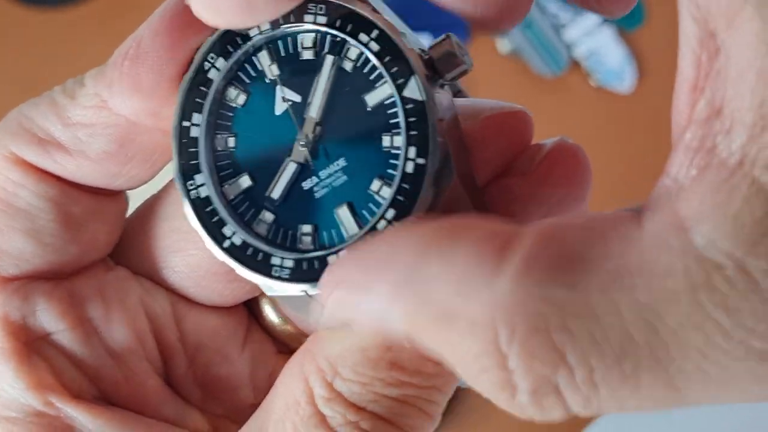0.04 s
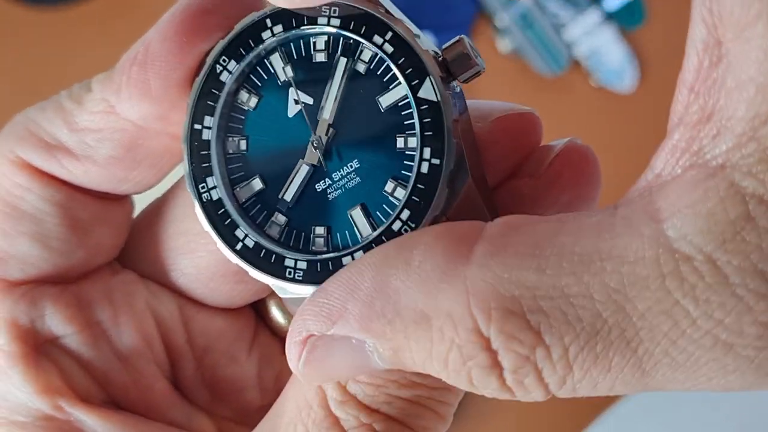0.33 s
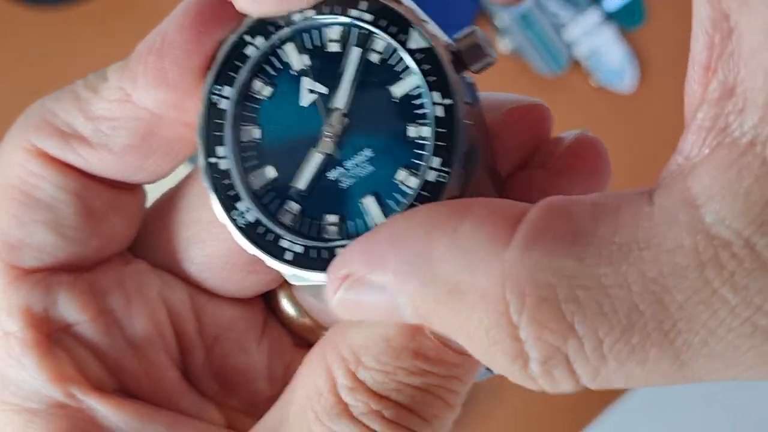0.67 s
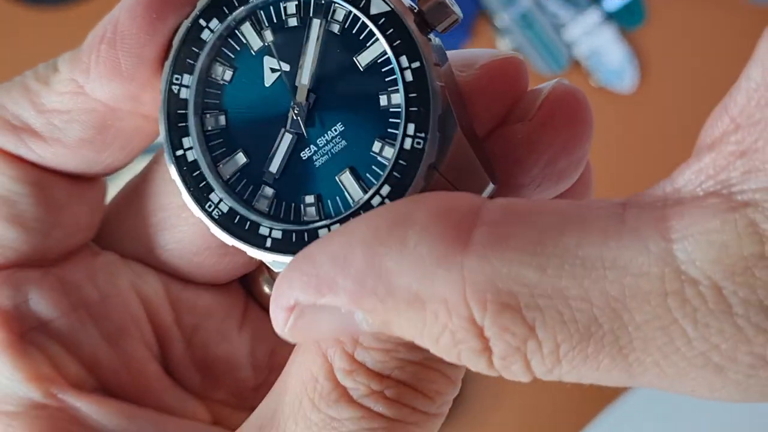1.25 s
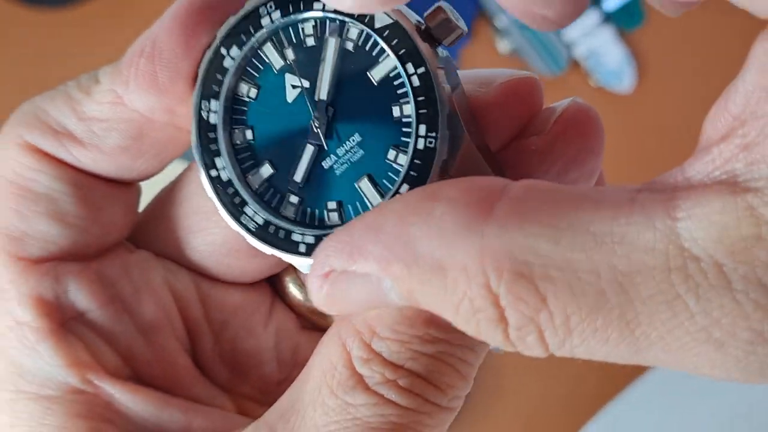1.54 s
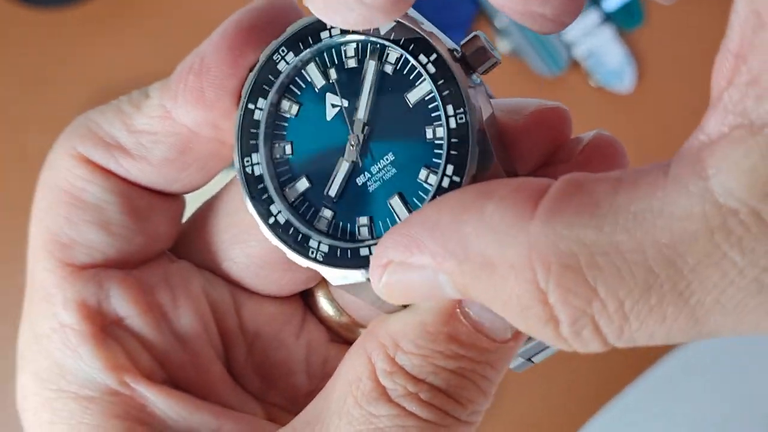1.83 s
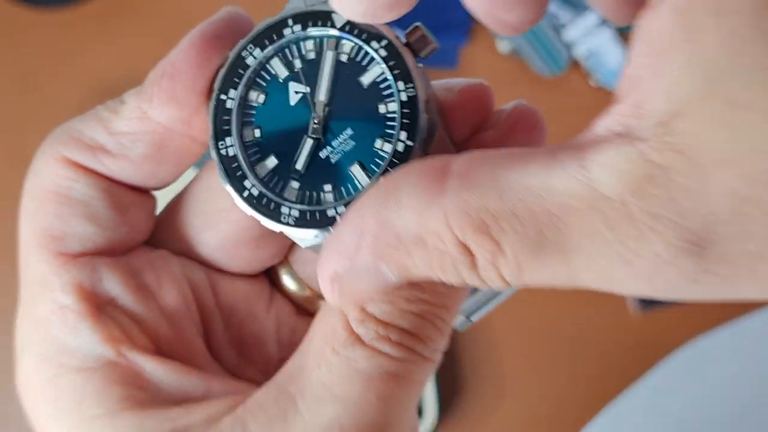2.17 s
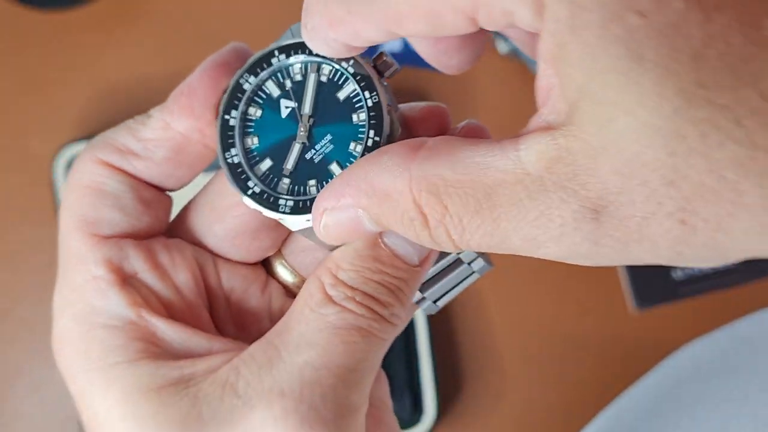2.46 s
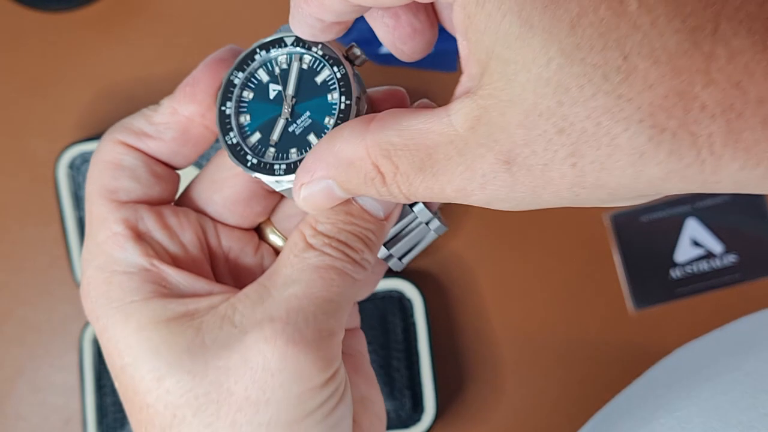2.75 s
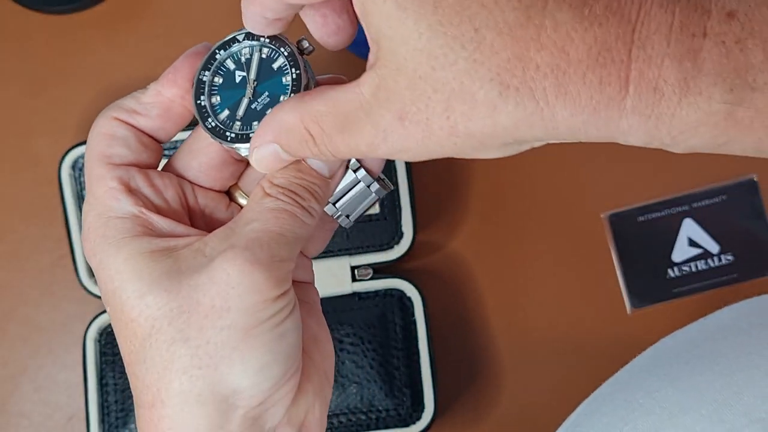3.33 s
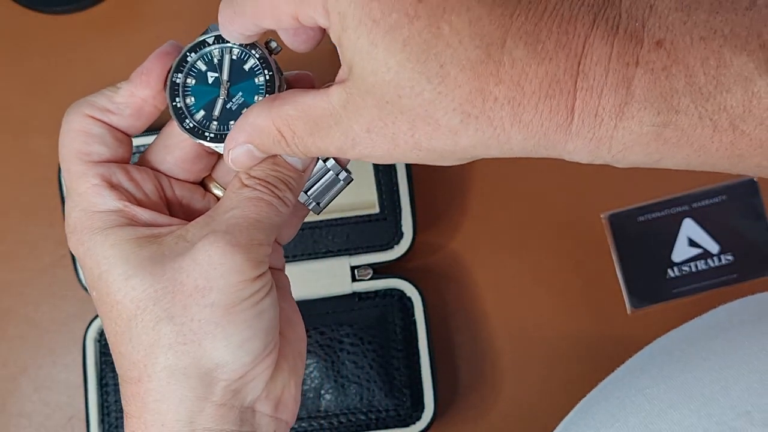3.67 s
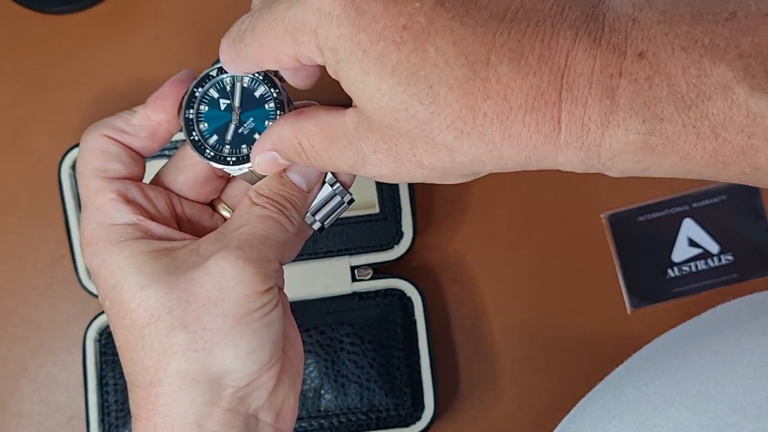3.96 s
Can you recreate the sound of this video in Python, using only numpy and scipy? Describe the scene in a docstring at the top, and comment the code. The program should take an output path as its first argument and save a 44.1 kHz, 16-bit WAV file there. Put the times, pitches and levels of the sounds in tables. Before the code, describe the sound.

Crisp ratcheting clicks come from a watch bezel twisted close to the microphone, in six brief bursts separated by pauses. Faint finger rubs and a few dull handling bumps accompany them over the low hum of a quiet room.

```python
"""Turning a watch bezel

A steel bezel is turned by hand in six short twists, close up in a quiet room. At each tooth the click
spring snaps and rings the case; every new grip colours the ring and the echo off the desk.
The hands bump softly, skin rubs on the rim and the bracelet rustles, over a low room hum."""
import sys
import numpy as np
from scipy import signal
from scipy.fft import rfft, irfft, next_fast_len
from scipy.io import wavfile
from scipy.ndimage import uniform_filter1d, map_coordinates

SR = 44100
rng = np.random.default_rng(int(sys.argv[2]) if len(sys.argv) > 2 else 0)


def store_pcm(level_fs):
    """Save levels as 16-bit WAV."""
    pcm = np.round(np.clip(level_fs, -1, 1) * 32767).astype(np.int16)
    wavfile.write(sys.argv[1], SR, np.atleast_2d(pcm).T)


N = 176400

# room air spectrum: (frequency [Hz], relative density [dB])
AIR_SPECTRUM = [(15, -53), (25, -19), (53, -1), (240, -1.5), (289, 2.5), (322, -1), (631, -9), (722, -10.5),
                (804, -5), (871, -5.5), (1020, -15), (1200, -6), (1300, -12.5), (1450, -10.5), (3090, -23),
                (5880, -21.5), (15500, -23)]
AIR_DB = -54.5


def amp(db):
    return 10 ** (np.asarray(db) / 20)


def unit_energy(x):
    return x / np.sqrt(np.sum(x ** 2) + 1e-20)


def bell(x, centre, sigma):
    return np.exp(-.5 * ((x - centre) / sigma) ** 2)


def log_interp(points, hz):
    freqs, values = np.transpose(points)
    return np.interp(np.log(hz + 1), np.log(freqs + 1), values)


def mix_at(track, time_s, x):
    i = max(round(time_s * SR), 0)
    track[i:i + len(x)] += x[:len(track) - i]


def filtered(x, response):
    size = next_fast_len(N + SR // 2)
    return irfft(rfft(x, size) * response(np.fft.rfftfreq(size, 1 / SR)), size)[..., :N]


def minimum_phase(gain_db):
    """Causal response with this gain."""
    cepstrum = irfft(np.log(amp(gain_db)))
    cepstrum[1:len(cepstrum) // 2] *= 2
    cepstrum[len(cepstrum) // 2 + 1:] = 0
    return np.exp(rfft(cepstrum))


def noise(spectrum):
    """Coloured noise, rms 1."""
    coloured = filtered(rng.standard_normal(N), lambda hz: amp(log_interp(spectrum, hz)))
    return np.sqrt(N) * unit_energy(coloured)


def burst(t, t60_s):
    """Decaying white noise."""
    return rng.standard_normal(len(t)) * amp(-60 * t / t60_s)


def friction(swells, spectrum):
    """Coloured noise in Gaussian swells."""
    t = np.arange(N) / SR
    return noise(spectrum) * sum(amp(db) * bell(t, time_s, sigma_s) for time_s, db, sigma_s in swells)


def in_room(near, spill, tail_db):
    """Near sound plus the spill's reflections off nearby things and walls, drawn anew per call."""
    # wall reverberation: (frequency [Hz], T60 [s])
    decay = [(200, 0.54), (1500, 0.3), (4000, 0.23), (9000, 0.21), (15000, 0.16)]
    hz, t, bands = signal.stft(rng.standard_normal(SR // 3), SR, nperseg=256)
    tail = signal.istft(bands * amp(-60 * t / log_interp(decay, hz)[:, None]), SR, nperseg=256)[1]
    t = np.arange(len(tail)) / SR
    onset = 1 - np.exp(-(t / .004) ** 2)
    early = amp(-12) * unit_energy(burst(t, t60_s=.052) * onset)
    reflections = early + amp(tail_db) * unit_energy(tail * onset)
    return np.pad(near, (0, len(reflections) - 1)) + signal.fftconvolve(spill, reflections)


def room_tone():
    """Steady air noise and a faint wavering hum."""
    # hum tones: (frequency [Hz], rms level [dB])
    tones = [(65, -73), (204, -72.5), (301, -67.5)]
    t, hum, knots = np.arange(N) / SR, np.zeros(N), 24
    for hz, db in tones:
        waver_rad = .91 * map_coordinates(rng.standard_normal(knots + 4), [np.linspace(0, knots, N)])
        hum += amp(db) * np.sqrt(2) * np.sin(2 * np.pi * hz * t + waver_rad)
    return amp(AIR_DB) * noise(AIR_SPECTRUM) + hum


def bracelet_rustle():
    """Fingers shift on the bracelet: faint, bright friction."""
    # finger shifts: (time [s], level [dB], sigma [s])
    shifts = [(2.04, -65, .025), (2.255, -66, .02), (2.85, -64.5, .03), (3, -65, 0.011), (3.76, -60, .012)]
    # rustle spectrum: (frequency [Hz], relative level [dB])
    spectrum = [(1000, -25), (3500, -6), (6000, -1), (9000, -5), (15000, -18)]
    return friction(shifts, spectrum)


def skin_rubs():
    """Skin slides on the rim: brief, dull friction."""
    # slides: (time [s], level [dB], sigma [s])
    slides = [(0.385, -51.5, 0.0065), (0.48, -51, 0.01), (.55, -51, 0.041), (.667, -52, 0.01),
              (.723, -51, .012)]
    # skin friction spectrum: (frequency [Hz], relative level [dB])
    spectrum = [(200, -18), (600, -6.5), (850, 4), (1300, -5.5), (2300, -14), (4500, -34), (15000, -34)]
    return friction(slides, spectrum)


def hand_bumps():
    """Each bump is a short fleshy tap and a damped low thud."""
    # bumps: (time [s], level [dB], pitch [Hz], T60 [s])
    bumps = [(1.326, -41.5, 362, 0.015), (1.887, -37.5, 528, .01), (1.94, -31, 206, 0.035),
             (1.941, -39, 500, 0.015), (1.971, -41, 196, 0.072), (2.196, -18.5, 358, 0.015),
             (2.204, -39.5, 190, 0.14), (2.222, -45, 400, 0.12), (2.622, -38, 322, 0.016),
             (3.297, -34.5, 410, 0.008), (2.309, -46.5, 69, 0.22), (3.481, -41, 66, 0.23),
             (3.6, -42.5, 69, 0.17), (3.81, -44, 69, 0.19), (3.849, -46, 66.4, .2),
             (3.957, -37, 455, 0.014)]
    tap_hz, tap_t60_s, rise_cycles = 620, .0089, .52
    track, t = np.zeros(N), np.arange(SR // 4) / SR
    tap = np.sin(2 * np.pi * tap_hz * t) * amp(-60 * t / tap_t60_s) * (1 - np.exp(-t * tap_hz))
    for time_s, db, hz, t60_s in bumps:
        rise = 1 - np.exp(-(t * hz / rise_cycles) ** 2)
        thud = np.sin(2 * np.pi * hz * t) * amp(-60 * t / t60_s) * rise
        tap_gain = amp(-8) * hz / tap_hz
        bump = thud / np.abs(thud).max() + tap_gain * tap / np.abs(tap).max()
        mix_at(track, time_s, amp(db) * in_room(bump, bump, tail_db=-18))
    return track


def spring_click(time_s, clack_db=0, body_db=0, low_db=2, high_hz=11000, high_db=5,
                 sparkle_db=-8, snap_db=-9):
    """Snap, chatter and dense ring through the gripped case; returns near sound and room spill."""
    # hand grips: (start [s], clack peak [Hz], its gain [dB], low resonance [Hz], rise [s],
    #   desk echo [dB], spill past the hand [dB])
    grips = [(0, 2440, -2.5, 7900, 0.00066, -17, 1.5), (.4, 4020, 6.5, 7960, 0.00063, -9.5, 0.5),
             (1.5, 2440, 4, 7560, 0.00045, -10, 0.5), (2.4, 2980, 7, 8100, 0.00056, -15.5, -2),
             (3, 2790, 2.5, 9000, 0.00047, -28, -3), (3.7, 2400, 3.5, 6060, 0.00028, -27, -4)]
    # case response to a snap: (frequency [Hz], gain [dB])
    case = [(60, -3.5), (350, -3), (700, -11.5), (1150, -18.5), (1700, -10), (2500, -4), (3500, -2.5),
            (4200, -3), (5200, -2.5), (6200, 1.5), (8500, 5), (10000, 3), (12500, 3), (15000, 3),
            (16500, 1.5)]
    grip = sum(time_s >= start_s for start_s, *_ in grips[1:])
    _, peak_hz, peak_db, low_hz, rise_s, desk_db, spill_db = grips[grip]
    size, desk_delay_s = 4096, .008
    t, hz = np.arange(size) / SR, np.fft.rfftfreq(size, 1 / SR)
    octave = np.log2(hz + 1)
    rise = 1 - np.exp(-(t / rise_s) ** 2)
    chatter = unit_energy(burst(t, t60_s=.005) * rise)
    ring = amp(-1.5) * rfft(unit_energy(burst(t, t60_s=.033) * rise))
    force = rfft(chatter) + amp(snap_db)  # the snap is an impulse
    force /= np.sqrt(np.abs(uniform_filter1d(np.abs(force) ** 2, size=120)))  # flatten broad bands

    case_db = (log_interp(case, hz)
               + clack_db * bell(octave, np.log2(1670), .66)
               + body_db * bell(octave, np.log2(5600), .27)
               + sparkle_db * bell(hz, 14400, 1150)
               + peak_db * bell(hz, peak_hz, 276))
    resonances_db = low_db * bell(hz, low_hz, 540) + high_db * bell(hz, high_hz, 880)
    softened = minimum_phase(case_db + .65 * resonances_db)  # weaker peaks for ring and spill
    direct = unit_energy(irfft(force * minimum_phase(case_db + resonances_db) + ring * softened))
    desk_gain = amp(desk_db) * bell(octave, np.log2(7000), 1.5)
    desk_echo = desk_gain * np.exp(-2j * np.pi * hz * desk_delay_s)
    near = irfft(rfft(direct) * (1 + desk_echo))
    spill = amp(spill_db) * unit_energy(irfft((force + ring) * softened))
    return near[:size // 2], spill[:size // 2]


def bezel():
    """Ratchet clicks and light touches ring the same steel, each slightly panned; returns mid, side."""
    # spring drops over a tooth: (time [s], relative level [dB], clack [dB], body [dB],
    #   low resonance [dB], high resonance [Hz], its gain [dB], sparkle [dB], snap [dB])
    teeth = [(.0002, -25.5, 9, 0, 5, 11900, 4, -4, 9), (0.0126, -22.5, 10.5, -1, 3, 10600, 6.5, 3, 2),
             (0.0335, -20.9, 10.5, 0.5, 2, 10800, 11.5, 6, -6),
             (0.5112, -22.5, 2, 1, 2, 13400, 9, -0.5, -10), (0.5222, -23.5, 6.5, 6, 2, 10350, 10, 11, -13),
             (0.5347, -19.5, -6, -5, 2, 12000, 9, -2, 3), (0.5465, -22.5, -1, -1.5, 5.5, 11650, 3, 1, -12),
             (0.5608, -22, -6, 1, -1, 11650, 11, 4, -10), (0.5772, -22.5, 5.5, 1, 18, 10550, 12, -3, -4),
             (0.6038, -21, -6.5, -3, 2, 11500, 8, 0, 0), (1.6139, -24, -4.5, 2.5, 6, 11300, 10, -1.5, -13),
             (1.645, -23.5, 4, -2, 9.5, 11200, 8, 2, -3), (1.6897, -22.5, -2, 1, 9.5, 12400, 6, 4, -15),
             (1.727, -20.5, -2, -1, 12, 12300, 9.5, 2.5, -8),
             (1.7499, -19.5, -3, 0, 7.5, 12150, 8.5, 3, -8), (1.7807, -22, -3, -1, 4, 12250, 4, 1, -10),
             (1.807, -21.5, 0.5, -1, 3, 12100, 1, 1.5, -10),
             (1.8399, -21.5, 9, -0.5, 8, 11600, 7.5, 1.5, -15),
             (2.4845, -19.5, 6, -3, 2, 12760, 13, -4.5, -8), (2.55, -17.5, 1.5, 4, 7.5, 13000, 13, 1, -9),
             (2.5877, -20.8, -4.5, 5, 4.5, 13700, 10, -4, -18), (2.6213, -19, -3, 2, 5, 13500, 5, 3, -10),
             (3.1139, -17.5, -2.5, 4, 7.5, 13200, 12.5, 0, -1.5),
             (3.1727, -21.5, -1.5, 5.5, 8, 12050, 1, 3, -7), (3.212, -18.5, 0.5, 4, 8, 12900, 0, 2, -1),
             (3.236, -19, 9.5, 6, 4, 12400, 5, 5.5, 3), (3.8287, -18, 2.5, 3, 1, 13050, 2, 2, -8),
             (3.8548, -17, 4, -4, 10, 12700, 8.5, -1, 4), (3.9394, -19.5, 9, 1.5, 6, 10000, 8.5, 4.5, -2),
             (3.985, -16.5, 5, -3.5, 13.5, 12400, 4, 8, 0)]
    # nail and bracelet touches: (time [s], relative level [dB])
    touches = [(.155, -54), (1.001, -57), (2.056, -53), (2.069, -57), (2.255, -52), (2.272, -55),
               (2.295, -52), (3.809, -46)]
    gain_db, pan_spread_db = 23, .5
    mid, side = np.zeros(N), np.zeros(N)
    for time_s, db, *colour in teeth + touches:
        near, spill = spring_click(time_s, *colour)
        click = amp(db + gain_db) * in_room(near, spill, tail_db=-11)
        pan = (amp(pan_spread_db * rng.standard_normal()) - 1) / 2
        mix_at(mid, time_s, click)
        mix_at(side, time_s, click * pan)
    return mid, side


def scene():
    """All sources near centre, with a trace of width."""
    steel, steel_side = bezel()
    scatter = unit_energy(burst(np.arange(SR // 50) / SR, t60_s=.0061))
    side = steel_side + amp(-37) * signal.fftconvolve(steel, scatter)[:N]
    side += amp(AIR_DB - 30) * noise(AIR_SPECTRUM)
    mid = steel + hand_bumps() + skin_rubs() + bracelet_rustle() + room_tone()
    return np.array([mid + side, mid - side])


def record(dry):
    """Bass cut and steep treble limit."""
    low_cut_hz, top_hz = 43, 15900
    thinned = filtered(dry, lambda hz: 1 - 1 / (1 + (hz / low_cut_hz) ** 4))
    return filtered(thinned, lambda hz: 1 / np.sqrt(1 + (hz / top_hz) ** 160))


dry = scene()
out = record(dry)
store_pcm(out)
```